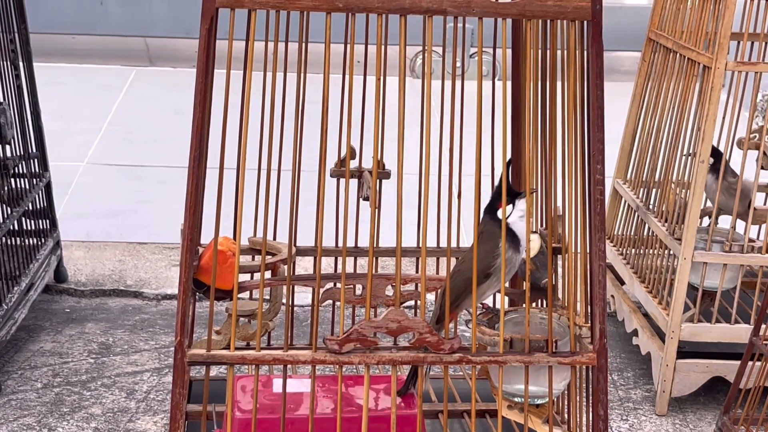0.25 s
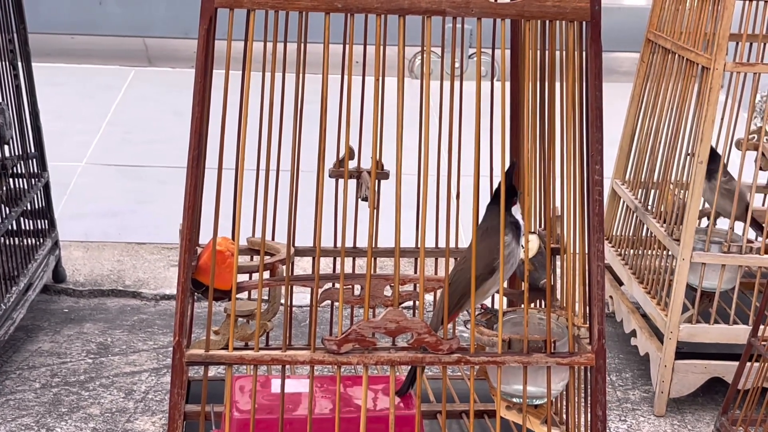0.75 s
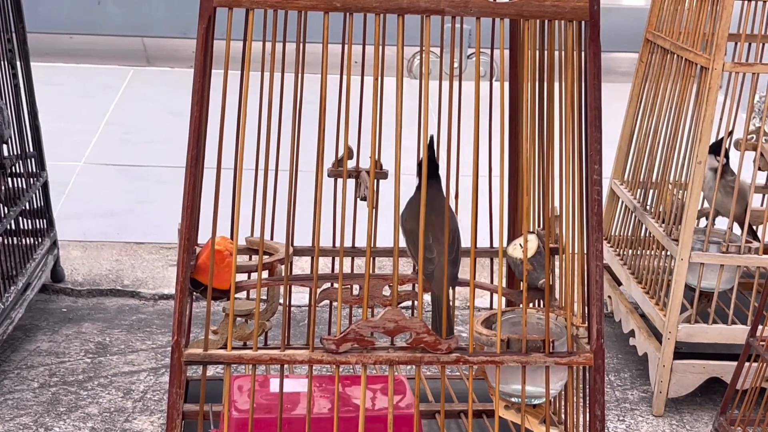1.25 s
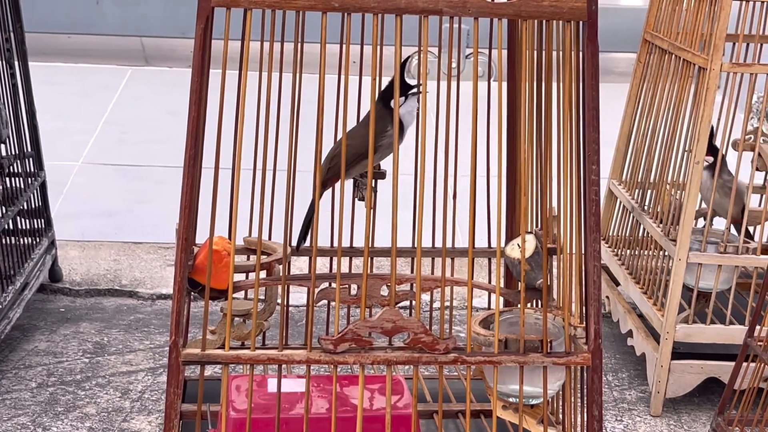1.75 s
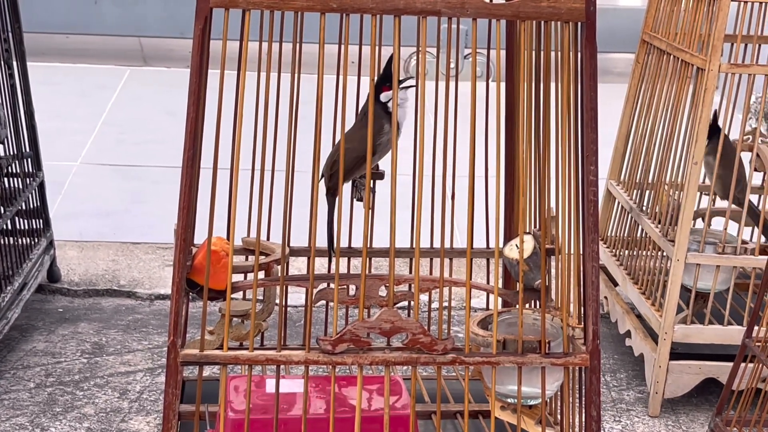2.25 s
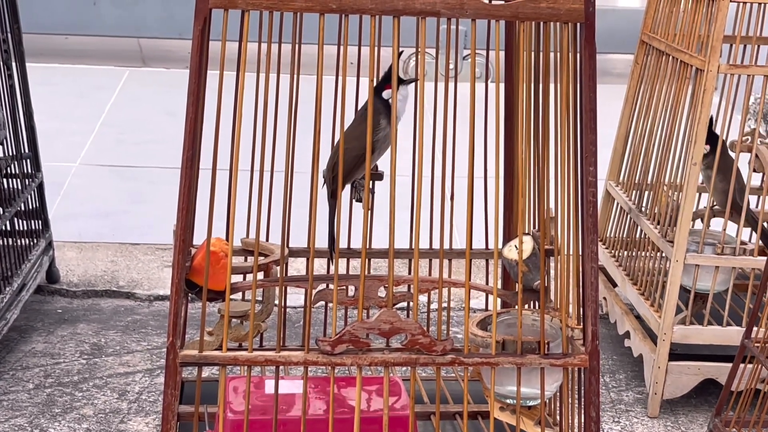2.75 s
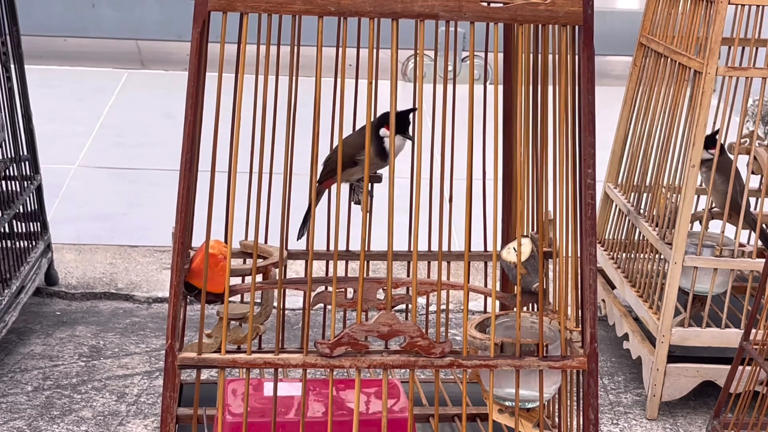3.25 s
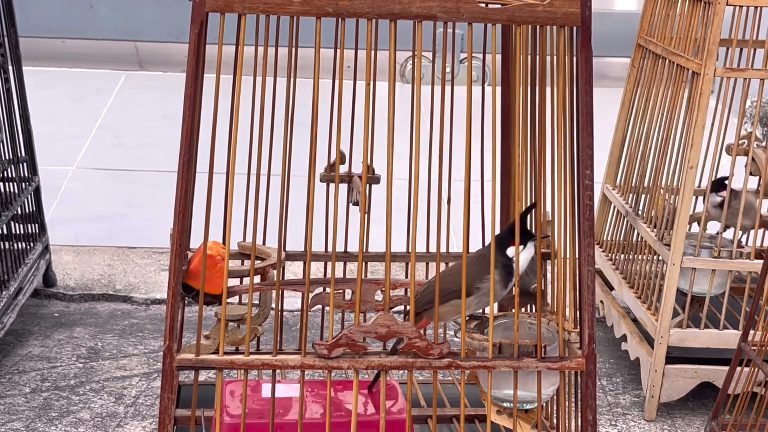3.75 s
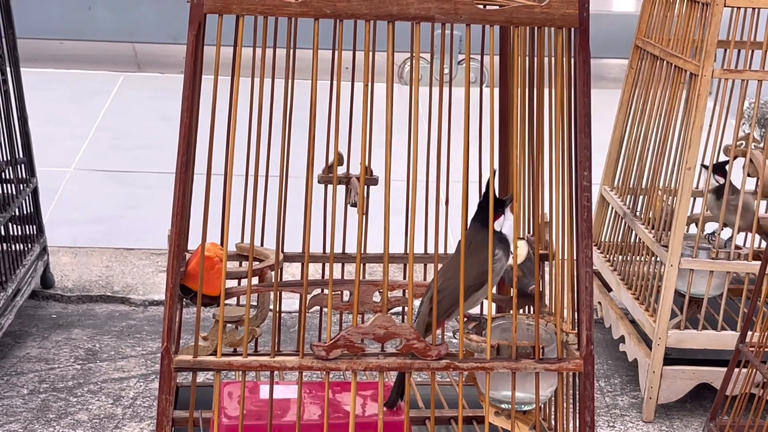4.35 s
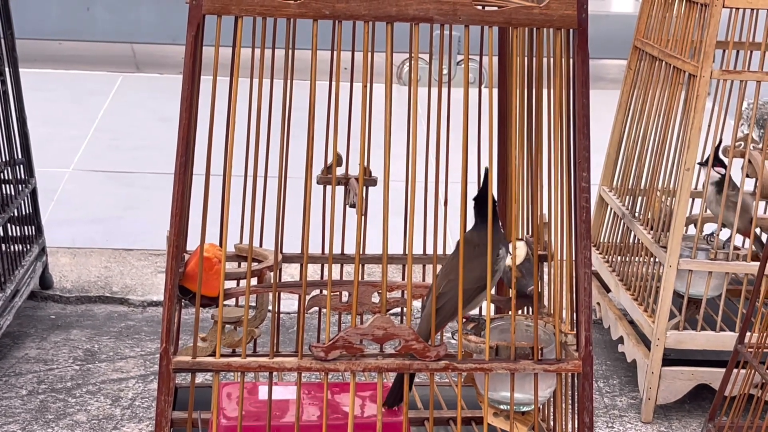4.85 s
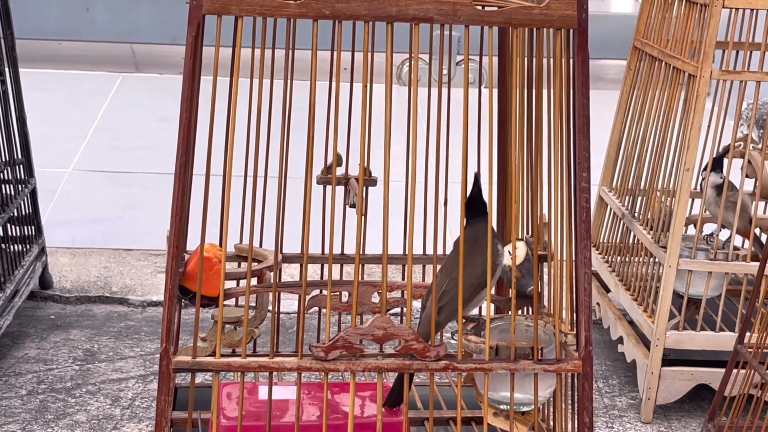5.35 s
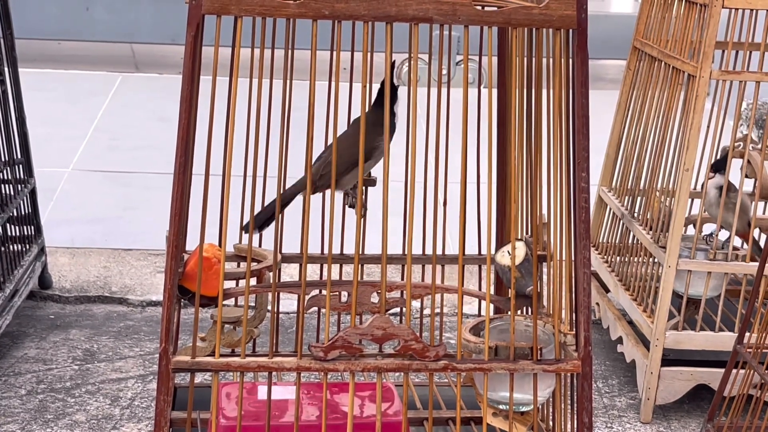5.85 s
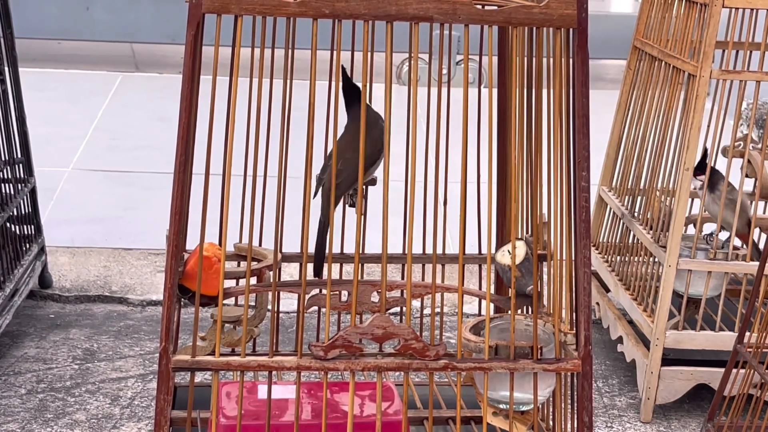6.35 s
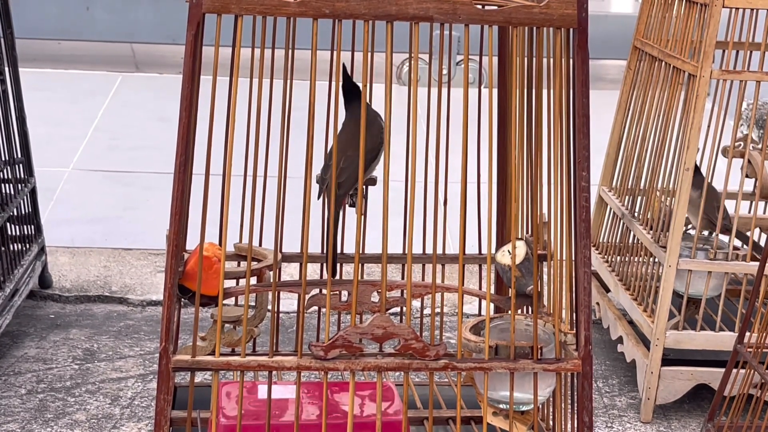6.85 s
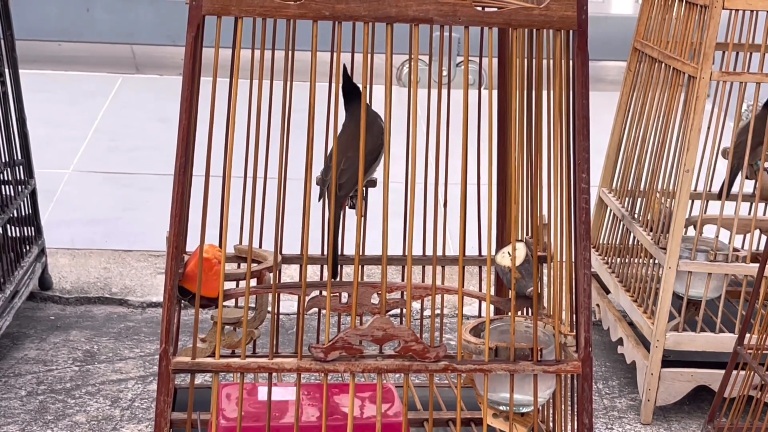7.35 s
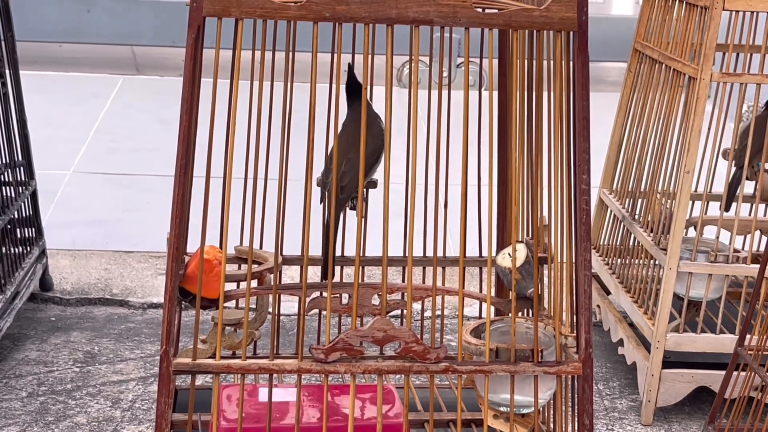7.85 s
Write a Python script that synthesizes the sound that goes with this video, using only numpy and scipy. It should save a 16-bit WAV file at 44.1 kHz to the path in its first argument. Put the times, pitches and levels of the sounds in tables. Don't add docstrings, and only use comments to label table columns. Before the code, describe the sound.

A caged songbird very close sings bright whistled phrases, each note gliding and fluttering rapidly. It sings at once, again after a second, then once more past the middle, before falling silent. Neighbouring birds give short hoarse chirps and faint claw scratches; farther birds whistle softly. Low wind thumps bump the microphone over faint town hiss. Outdoor walled yard, short reverberant tail, handheld phone close up.

```python
import sys
import numpy as np
from scipy import signal
from scipy.fft import rfft, irfft, next_fast_len
from scipy.io import wavfile
from scipy.ndimage import uniform_filter1d, map_coordinates

SR = 44100
rng = np.random.default_rng(int(sys.argv[2]) if len(sys.argv) > 2 else 0)


def store_wav(level_fs):
    pcm = np.round(np.clip(np.atleast_2d(level_fs), -1, 1) * 32767)
    wavfile.write(sys.argv[1], SR, pcm.T.astype(np.int16))


def invert_db(x):
    u = np.asarray(x, float) / 20
    return 10 ** u


N = 357651

# [f/Hz, density/dB]
BREATH = [(1000, -33), (2500, -4), (4500, -9.5), (9500, -18), (11000, -12.5), (12500, -17), (16000, -23)]


def unit(x):
    return x / np.sqrt(np.mean(x ** 2) + 1e-20)


def along(points, hz):
    f, v = np.transpose(points)
    return np.interp(np.log(hz + 1), np.log(f + 1), v)


def curve(rows):
    return np.interp(np.arange(N) / SR, *np.transpose(rows))


def wobble(rate_hz, size=N):
    knots = rng.standard_normal(int(size * rate_hz / SR) + 4)
    return map_coordinates(knots, [np.arange(size) * rate_hz / SR])


def add(track, s, sound):
    part = track[round(s * SR):][:len(sound)]
    part += sound[:len(part)]


def rush(spectrum, alike, patchy_db):
    hz, _, z = signal.stft(rng.standard_normal((2, N)), SR, nperseg=2048)
    field = uniform_filter1d(rng.standard_normal(z.shape[1:]), size=20, axis=0)
    field = unit(uniform_filter1d(field, size=3, axis=1))
    angle = np.arccos(np.clip(along(alike, hz), -1, 1))[:, None] / 2
    z = z * invert_db(along(spectrum, hz)[:, None] + patchy_db * field) * [np.cos(angle), np.sin(angle)]
    mid, side = signal.istft(z, SR, nperseg=2048)[1][:, :N]
    return unit(np.array([mid + side, mid - side]))


def voice(hz, overtones):
    phase = 2 * np.pi * np.cumsum(hz) / SR
    tone = np.sin(phase)
    for k, db in overtones:
        unsteady = .65 + .55 * wobble(500, size=len(hz))
        beak = .25 + .5 * (hz / 3000) ** 4
        tone = tone + invert_db(db) * unsteady * beak * np.sin(k * phase)
    return np.sqrt(2) * tone


def syllables():
    # [t/s from onset, pitch/Hz, level/dB re peak]
    climb = [(0, 1300, -22), (.012, 2100, -12), (.021, 2430, -2), (.036, 2500, -.5), (.059, 2800, -2.5),
             (.082, 3650, -6), (.101, 3950, -9), (.11, 3700, -24)]
    step_up = [(0, 2200, -30), (.02, 1900, -11), (.036, 1900, -13), (.04, 2400, -3), (.052, 2620, -.2),
               (.068, 2800, -3), (.088, 3000, -2), (.093, 3040, -8), (.104, 3060, -11)]
    flick = [(0, 1200, -26), (.008, 1700, -17), (.014, 2250, -12), (.018, 2300, -18), (.022, 2800, 1.5),
             (.026, 3200, -11), (.034, 3450, -8), (.052, 3600, -2.5), (.064, 3950, -16)]
    drop_down = [(0, 4000, -21), (.004, 2900, -13), (.008, 2560, -16), (.022, 2950, -3), (.026, 2500, -3),
                 (.034, 2540, -.2), (.072, 2600, -5.5), (.078, 2300, -13), (.094, 2230, -21)]
    close = [(0, 1400, -12), (.011, 1560, -.5), (.024, 1770, -5), (.062, 1750, -4), (.092, 1745, -11)]
    buzz = [(0, 3400, -19), (.006, 3050, -4), (.017, 3727, -5), (.041, 3560, -1.5), (.048, 3753, -2.5),
            (.055, 3500, -17)]
    scoop = [(0, 1106, -27), (.009, 2200, -16), (.014, 1950, -16), (.018, 2300, -6), (.035, 2370, -.2),
             (.041, 2300, -6), (.049, 2400, -21)]
    pip = [(0, 3700, -19), (.005, 2800, -.5), (.011, 3500, -19)]
    sag = [(0, 2760, -11), (.008, 2700, -3), (.021, 2620, -2.5), (.04, 2720, -1.2), (.05, 2650, -1.2),
           (.056, 2350, -1.5), (.069, 2280, -2.2), (.073, 2300, -14)]
    dip = [(0, 3200, -21), (.003, 2600, -16), (.012, 2620, -7), (.022, 2780, -.2), (.026, 2400, -5),
           (.035, 2450, -.2), (.048, 2450, -2.2), (.054, 2450, -11), (.095, 2150, -16)]
    fade = [(0, 2260, -5), (.061, 2260, -.5), (.086, 2050, -4), (.126, 1850, -10)]
    tail_note = [(0, 3147, -.5), (.014, 2800, -22)]
    hook = [(0, 1600, -22), (.004, 2200, -14), (.008, 2300, -9), (.011, 2200, -22), (.015, 2600, -6),
            (.019, 3100, -11), (.026, 3450, -3), (.042, 3730, -.2), (.06, 3850, -8)]
    stride = [(0, 2200, -28), (.012, 2000, -18), (.026, 1900, -13), (.035, 2100, -18), (.042, 2450, -7),
              (.052, 2680, -.2), (.078, 2900, -.2), (.091, 2950, -1.2), (.098, 3000, -16)]
    rise_up = [(0, 1300, -12), (.012, 2100, -15), (.036, 2450, -8), (.056, 2800, -.2), (.082, 3450, -2.5),
               (.103, 3750, -5), (.11, 3700, -21)]
    surge = [(0, 1700, -19), (.02, 2450, -3.5), (.055, 2530, -1.5), (.071, 2850, -6), (.092, 3885, -3),
             (.113, 3997, -.5), (.123, 3700, -21)]
    bend = [(0, 2100, -22), (.025, 1980, -8), (.031, 2000, -15), (.035, 2350, -3), (.054, 2650, -.2),
            (.063, 3150, -5), (.075, 3200, -.2), (.092, 3150, -3), (.105, 3050, -14)]
    stop_note = [(0, 1650, -20), (.009, 1650, -6), (.027, 1801, -.5), (.037, 1840, -25)]
    # gesture, onset to a pulse/s, flutter rate/Hz, pitch swing/Hz, pulse depth/dB
    return dict(CLIMB=(climb, .074, 108, 420, 20), STEP=(step_up, .05, 93, -370, 2),
                FLICK=(flick, .044, 96, 90, 8), DROP=(drop_down, .06, 80, 380, 1),
                CLOSE=(close, .007, 110, 20, 1.5), BUZZ=(buzz, .022, 117, 350, 2),
                SCOOP=(scoop, .005, 121, 30, .5), PIP=(pip, .005, 122, 0, 0),
                SAG=(sag, .0395, 84, 230, 1), STRIDE=(stride, .0497, 90, -340, 3),
                RISE=(rise_up, .0745, 108, 420, 20), DIP=(dip, .022, 85, 40, 1),
                HOOK=(hook, .044, 110, 50, 3), FADE=(fade, .058, 60, -250, 14),
                TAIL=(tail_note, .007, 85, 30, 0), SURGE=(surge, .086, 115, 380, 17),
                BEND=(bend, .053, 95, 240, 3), STOP=(stop_note, .008, 85, 20, 1))


def note(gesture, pulse_s, rate_hz, swing_hz, depth_db, name, peak_db, factor):
    # [break/dB, extra turns, settling/s]
    quirks = dict(STEP=(16, 3, .03), STRIDE=(16, 1, .025), BEND=(12, 2, .02), CLIMB=(0, 6, .001),
              RISE=(0, 6, .001), SURGE=(0, 3, .001), DROP=(15, 0, .001), BUZZ=(6, 0, .001), SAG=(7, 0, .03),
              HOOK=(8, 0, .001))
    steady_s = dict(DROP=.044, SAG=.018)
    hurry_s = .011
    s, hz, db = np.transpose(gesture)
    t = np.arange(0, s[-1], 1 / SR)
    glide_hz = np.interp(t, s, hz * factor)
    height = glide_hz / (max(hz) * factor)
    break_db, extra_turns, settle_s = quirks.get(name, (0, 0, .001))

    since = t - pulse_s
    phase = 2 * np.pi * (rate_hz * since - 130 * since ** 2)
    phase += .25 * wobble(45, size=len(t))
    phase -= 2 * np.pi * extra_turns * np.exp(-t / hurry_s)

    strain = height ** 2 * np.clip((s[-1] - t) / settle_s, 0, 1)
    strain *= np.clip((t - steady_s.get(name, -1)) / .006, 0, 1)
    swing = swing_hz * strain * np.cos(phase + 1.3)
    reach = np.sign(swing_hz) * np.cos(phase + 1.6)
    crest = np.maximum(reach, -.78 * reach) ** 4 * np.sqrt(strain)
    pulse_db = depth_db * height * 1.2 * np.cos(phase) / 2
    valve = unit(invert_db(-break_db * crest + pulse_db + 1.4 * wobble(280, size=len(t))))
    level = invert_db(peak_db + np.interp(t, s, db)) * valve * signal.windows.tukey(len(t), .005 / s[-1])
    return level, glide_hz + swing + 16 * wobble(250, size=len(t))


def song():
    # [syllable, t/s, peak/dB]
    sung = [("TAIL", 0, -9), ("BUZZ", .064, -8.5), ("SCOOP", .163, -4.5), ("PIP", .212, -4.5),
            ("SAG", .232, -7), ("STOP", .305, -19), ("FADE", .922, -33), ("SURGE", 1.195, -14),
            ("BEND", 1.493, -10.5), ("HOOK", 1.658, -7.5), ("DIP", 1.793, -8.5), ("RISE", 1.809, -15),
            ("STRIDE", 2.049, -7), ("DROP", 2.319, -7.5), ("CLOSE", 2.407, -24), ("CLIMB", 4.198, -12),
            ("STEP", 4.446, -6), ("DROP", 4.716, -5), ("CLOSE", 4.805, -21.5)]
    # [syllable, t/s, peak/dB, pitch factor]
    varied = [
        ("CLOSE", 1.886, -24, 1.045),
        ("FLICK", 2.197, -11, .985),
        ("FLICK", 4.597, -16, 1.005),
    ]
    # [multiple, level/dB at 3 kHz]
    overtones = [(2, -34), (3, -26), (4, -34), (5, -35), (6, -35)]
    tone, effort = np.zeros(N), np.zeros(N)
    repertoire = syllables()
    for name, start_s, peak_db, factor in [(*row, 1) for row in sung] + varied:
        level, pitch_hz = note(*repertoire[name], name, peak_db, factor)
        swing_hz = repertoire[name][3]
        add(tone, start_s, level * voice(pitch_hz, overtones))
        add(effort, start_s, level * (0.9 + abs(swing_hz) / 300))
    return tone + invert_db(-35.5) * effort * rush(BREATH, [(100, 1)], patchy_db=4)[0]


def facing(x):
    # [from/s, to/s, highs/dB]
    turns = [
        (.05, .15, 11.5),
        (.15, .21, 10),
        (.21, .4, 1.5),
        (1.1, 1.4, -7),
        (2.04, 2.3, 8),
        (2.3, 2.55, 4),
        (4.68, 4.9, -4),
    ]
    beam_hz = 9800
    size, t = next_fast_len(N), np.arange(N) / SR
    highs = irfft(rfft(x, size) * (np.fft.rfftfreq(size, 1 / SR) > beam_hz), size)[:N]
    return x + highs * sum((invert_db(db) - 1) * (t >= t0) * (t < t1) for t0, t1, db in turns)


def chirps():
    # [t/s, length/s, start f/Hz, level/dB]
    contact = [(.445, .056, 1298, -47), (.614, .043, 1268, -52), (.738, .027, 1190, -49),
               (.901, .061, 1500, -50), (1.16, .045, 1204, -45), (1.383, .072, 1250, -47),
               (1.454, .059, 1320, -38), (2.61, .053, 1270, -44.5), (2.894, .06, 1550, -49.5),
               (3.019, .05, 1130, -48), (1.635, .025, 1400, -45), (3.15, .045, 1600, -49),
               (4.235, .065, 1400, -48), (7.625, .04, 1600, -53), (3.39, .042, 1520, -47),
               (3.756, .019, 1220, -44.5), (3.876, .054, 1490, -46.5), (5.908, .061, 1900, -53),
               (6.043, .033, 1300, -50), (6.235, .065, 1660, -46.5), (6.404, .025, 1270, -48.5),
               (6.602, .057, 1480, -49.5), (7.242, .045, 1250, -53), (7.378, .037, 1350, -53.5),
               (7.732, .059, 1780, -47), (8.088, .02, 1300, -40.5)]
    # [t/s, level/dB]
    yelps = [
        (3.555, -37),
        (6.134, -42),
    ]
    # [delay/s, length/s, start f/Hz, end f/Hz]
    halves = [
        (0, .024, 1150, 1750),
        (.02, .022, 1250, 1450),
    ]
    end_hz, arch_hz = 1450, 210
    out, effort = np.zeros(N), np.zeros(N)
    calls = [(s, length, hz, end_hz, db) for s, length, hz, db in contact]
    calls += [(s + delay, length, hz0, hz1, db) for s, db in yelps for delay, length, hz0, hz1 in halves]
    for s, length, hz0, hz1, db in calls:
        n = round(length * SR)
        arch = np.sin(np.pi * np.linspace(0, 1, n) ** .75) ** 2
        pitch_hz = np.linspace(hz0, hz1, n) + arch_hz * arch + 60 * wobble(300, size=n)
        level = invert_db(db + 3 + 2 * wobble(220, size=n)) * np.hanning(n) ** 0.29
        add(out, s, level * voice(pitch_hz, [(2, 7), (3, -4), (4, -22)]))
        add(effort, s, level)
    return out + invert_db(-15) * effort * rush(BREATH, [(100, 1)], patchy_db=2)[0]


def hops():
    # [t/s, peak/dB]
    scratches = [
        (1.0456, -41),
        (2.6344, -30),
        (3.03, -35),
        (3.6721, -32.5),
        (4.3854, -33.5),
        (5.6805, -47),
        (6.7476, -43.5),
    ]
    # [t/s, level/dB]
    plucks = [
        (.752, -50),
        (3.672, -46),
    ]
    # [f/Hz, level/dB, t60/s]
    wire = [(5630, -2, .08), (8950, 0.5, .1), (12100, -4, 0.044)]
    out, t = np.zeros(N), np.arange(SR // 8) / SR
    swell = t / .011 * np.exp(1 - t / .011)
    for s, db in scratches:
        grit = uniform_filter1d(np.diff(rng.standard_normal(len(t) + 1)), size=3)
        add(out, s - .008, invert_db(db - 5) * grit * swell)
    for s, db in plucks:
        for hz, mode_db, t60 in wire:
            add(out, s, invert_db(db + mode_db + rng.normal(0, 3) - 60 * t / t60) * np.sin(2 * np.pi * hz * t))
    return out


def far_birds():
    # [t/s, length/s, f/Hz, level/dB]
    plain = [(2.827, .067, 2110, -50.5), (2.986, .06, 3092, -44), (3.668, .02, 4150, -48),
             (6.74, .025, 4150, -50), (7.63, .07, 3090, -46), (3.27, .092, 1880, -52.5),
             (3.845, .045, 2085, -52.5), (4.009, .068, 3092, -42), (5.124, .07, 3060, -41),
             (5.975, .07, 2100, -54), (5.404, .088, 1830, -55), (7.672, .095, 3875, -46),
             (7.89, .08, 2090, -52), (8.05, .048, 3112, -39)]
    warbled = [(2.637, .044, 1850, -46.5), (3.079, .13, 2655, -50.5), (3.31, .07, 2340, -50),
               (3.421, .07, 2506, -44), (3.68, .07, 2900, -50), (6.005, .05, 2500, -53),
               (4.108, .17, 2640, -50), (5.238, .1, 2650, -49), (5.325, .072, 3380, -52),
               (6.066, .11, 2530, -48.5), (.004, .06, 3000, -31), (.004, .06, 2250, -36)]
    trilled = [(1.028, .026, 3480, -49), (2.565, .12, 3340, -46.5), (2.856, .084, 3310, -46.5),
               (3.17, .15, 3420, -43.5), (3.608, .07, 3030, -43.5), (3.89, .07, 3310, -45.5),
               (5.009, .071, 3315, -46.5), (5.83, .12, 3400, -50), (7.625, .11, 2800, -47),
               (7.916, .1, 3400, -45.5)]
    # [t/s, length/s, start f/Hz, end f/Hz, level/dB]
    falling = [
        (.112, .012, 3500, 1100, -25),
        (2.401, .17, 6820, 5950, -51.5),
        (2.513, .039, 6260, 4580, -47),
    ]
    out = np.zeros(N)
    calls = [(*row, 0) for row in falling]
    for rows, swing_hz, rise_hz in [(plain, 0, 0), (warbled, 80, 0), (trilled, 250, 120)]:
        calls += [(s, length, hz - rise_hz / 2, hz + rise_hz / 2, db, swing_hz) for s, length, hz, db in rows]
    for s, length, hz0, hz1, db, swing_hz in calls:
        n = round(length * SR)
        flutter = np.sin(2 * np.pi * 105 * np.arange(n) / SR) + .6 * wobble(90, size=n)
        pitch_hz = np.linspace(hz0, hz1, n) + swing_hz * flutter
        level = invert_db(db + 4 * wobble(100, size=n)) * np.hanning(n) ** .8
        add(out, s, level * voice(pitch_hz, []))
    return out


def nearby(x):
    copies = [(.0021, -24), (.0037, -20), (.0062, -17), (.011, -22), (.017, -23)]  # delay/s, level/dB
    return x + sum(invert_db(db) * np.pad(x, (round(s * SR), 0))[:N] for s, db in copies)


def yard(x, decay):
    hz, t, z = signal.stft(rng.standard_normal((2, SR)), SR, nperseg=256)
    tail = signal.istft(z * invert_db(-60 * t / along(decay, hz)[:, None]), SR, nperseg=256)[1]
    tail[1] = 1.2 * tail[0] + 0.21 * tail[1]
    return signal.fftconvolve(x[None], tail / np.linalg.norm(tail, axis=1)[:, None], axes=1)[:, :N]


def ports(x):
    # [f/Hz, phase/rad]
    lead_rad = [(1000, .45), (4500, .55), (9500, 1.2), (11200, 1.9), (12300, .9)]
    size = next_fast_len(N + 4096)
    half = along(lead_rad, np.fft.rfftfreq(size, 1 / SR)) / 2
    return irfft(rfft(x, size) * np.exp(1j * np.array([half, -half])), size)[:, :N]


def gusts():
    # [t/s, peak/dB, fall/(dB/s)]
    blows = [(.3, -52, 3), (2.3, -45, 120), (3.2, -50, 20), (3.52, -34, 120), (4.25, -36, 90),
             (4.55, -53, 70), (5.0, -45, 40), (5.25, -47, 110), (6.08, -48.5, 24), (6.97, -35, 110),
             (7.77, -44.5, 50), (8.11, -41, 40)]
    calm_db, swell_db_per_s = -63, 130
    t = np.arange(N) / SR
    strength = invert_db(calm_db)
    for s, db, fall in blows:
        strength = strength + invert_db(db - np.where(t < s, swell_db_per_s * (s - t), fall * (t - s)))
    return strength


def wind():
    # [t/s, peak/dB, f/Hz]
    thumps = [(1.391, -11.5, 121), (1.461, -19.5, 117), (1.697, -24, 135), (1.766, -19, 117),
              (2.295, -21.5, 287), (2.2, -40, 110), (3.06, -33, 188), (3.279, -32, 242), (3.431, -29, 231),
              (4.5, -28, 520), (3.514, -27, 520), (3.55, -28, 420), (3.705, -35, 245), (4.225, -31, 269),
              (4.966, -30, 191), (5.03, -37, 50), (5.206, -31, 221), (6.076, -30, 258), (6.23, -32, 269),
              (6.574, -36, 231), (6.828, -36, 221), (6.973, -32, 520), (7.882, -32, 312), (7.995, -35, 256),
              (8.039, -34, 186), (3.111, -32, 216), (3.221, -28, 263), (3.499, -21.5, 335),
              (3.917, -29, 283), (4.147, -23, 314), (4.342, -18, 420), (4.498, -23.5, 275),
              (4.998, -23.5, 317), (5.088, -21, 229), (5.248, -26.5, 336), (6.679, -29.5, 191),
              (6.933, -23.5, 268.4), (7.188, -31, 449), (7.757, -22, 383)]
    # [t/s, level/dB]
    rumble = [
        (0, -39.5),
        (1.28, -41),
        (1.38, -19),
        (1.5, -26.5),
        (1.58, -31),
        (1.7, -26),
        (1.8, -27),
        (1.95, -68.5),
    ]
    # [f/Hz, density/dB]
    buffet = [(20, -25), (60, -12.5), (140, -5), (260, 0.5), (550, -11.5), (1000, -23), (1600, -62)]
    # [f/Hz, density/dB]
    bass = [(12, -38), (20, -7.5), (44, -1), (65, 6), (134, -7), (206, -13), (400, -28), (520, -66.5),
            (880, -120)]
    lumps = invert_db(4.3 * wobble(40) + 2 * wobble(9) + .7 * np.array([wobble(30), wobble(30)]))
    roar = rush(buffet, [(100, .99), (300, .78), (600, .42)], patchy_db=0.5)
    out = invert_db(1.5) * gusts() * unit(lumps * roar)
    rumble_db = np.where(np.arange(N) < rumble[-1][0] * SR, curve(rumble), -90)
    out += invert_db(rumble_db) * unit(invert_db(2.5 * wobble(21)) * rush(bass, [(50, 0.94)], patchy_db=2))
    pops = np.zeros(N)
    for s, db, hz in thumps:
        cycles = np.arange(round(2.5 * SR / hz)) * hz / SR
        add(pops, s, invert_db(db) * np.sin(np.pi * cycles / 2.5) ** 2 * np.sin(2 * np.pi * cycles))
    return out + pops * invert_db([[.4], [-.4]])


def town(bird):
    # [t/s, level/dB]
    hiss = [
        (0, -58.5),
        (3.3, -58.5),
        (3.7, -56.5),
        (4.2, -59),
        (8.11, -60),
    ]
    # [f/Hz, density/dB]
    hum_spectrum = [(90, -36), (160, -9), (500, -6.5), (1250, -10), (2250, -14), (5000, -19.5),
                    (9500, -20.5), (11400, -30), (12600, -44), (16000, -72.5)]
    # [f/Hz, left-right likeness]
    likeness = [(60, 0.73), (230, 0.75), (850, 0.51), (3220, 0.7), (12200, 0.37)]
    loudness = uniform_filter1d(np.pad(np.abs(bird), (1800, 0))[:N], size=4000)
    duck = 1 / (1 + 5 * loudness)
    return duck * invert_db(curve(hiss) + 5.5 + .8 * wobble(4)) * rush(hum_spectrum, likeness, patchy_db=1.2)


def whine():
    # [f/Hz, width/Hz, level/dB]
    whine_bands = [(4350, 120, -3), (4750, 150, -4), (5600, 130, -.5)]
    start_s, length_s, level_db = 3.4, .75, -58
    out, n = np.zeros((2, N)), round(length_s * SR)
    hz = np.fft.rfftfreq(n, 1 / SR)
    shape = sum(invert_db(db) / (1 + ((hz - centre) / width) ** 2) for centre, width, db in whine_bands)
    noise = rng.standard_normal((2, n))
    noise = unit(irfft(rfft(noise + 1.5 * noise[0]) * shape, n))
    out[:, round(start_s * SR):][:, :n] = invert_db(level_db) * np.hanning(n) ** .6 * noise
    return out


def scene():
    # [f/Hz, t60/s]
    near_walls = [(1000, 1.1), (1800, .95), (2300, .65), (3200, .8), (4200, .55), (6000, .18), (12000, .3)]
    # [f/Hz, t60/s]
    far_walls = [(1000, .8), (3000, .6), (4000, .35), (12000, .3)]
    bird, small, far = facing(song()), chirps() + hops(), far_birds()
    wet = yard(invert_db(-21) * bird + invert_db(-15) * small, near_walls)
    wet += yard(invert_db(-1.5) * far, far_walls)
    direct = nearby(bird + small + invert_db(-6) * far)
    return ports(direct + wet) + wind() + town(bird) + whine()


def low_cut():
    # [t/s, open/s, corner before/Hz, open/Hz, after/Hz]
    openings = [
        (.1, 1.73, 36, 30, 90),
        (2.2, .03, 90, 30, 105),
        (3.51, .01, 150, 120, 250),
        (5.03, .03, 140, 27, 170),
        (6.06, .05, 135, 50, 200),
        (6.7, .22, 185, 110, 245),
    ]
    open_s, shut_s, last_hz = .08, .06, 180
    rows = []
    for s, hold, before, low, after in openings:
        rows += [(s - open_s, before), (s, low), (s + hold, low), (s + hold + shut_s, after)]
    return rows + [(N / SR, last_hz)]


def band_limit(x):
    return signal.sosfilt(signal.butter(12, 15800, fs=SR, output="sos"), x)


def record(dry):
    air_hz, air_db, air_peak_hz, air_peak_db = 12850, -42, 15200, 23
    hz, t, z = signal.stft(dry, SR, nperseg=4096, noverlap=3584)
    hz, corner_hz = hz[:, None], np.interp(t, *np.transpose(low_cut()))
    notch = 1 - .93 * np.exp(-((hz - 10100) / 430) ** 4)
    peak = invert_db(9.9 * np.exp(-((hz - 11250) / 850) ** 2))
    edge_db = air_db * np.clip((hz - air_hz) / 800 + .5, 0, 1)
    air = invert_db(edge_db + air_peak_db * np.exp(-((hz - air_peak_hz) / 600) ** 2))
    z = z * notch * peak * air / np.sqrt(1 + (corner_hz / (hz + 1)) ** 14)
    x = signal.istft(z, SR, nperseg=4096, noverlap=3584)[1][:, :N]
    x = x / (1 + np.abs(x / 1.02) ** 30) ** (1 / 30)
    return band_limit(x)


dry = scene()
out = record(dry)
store_wav(out)
```